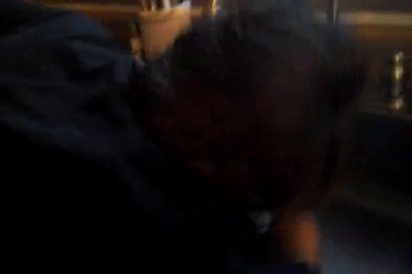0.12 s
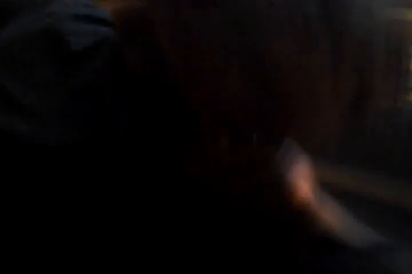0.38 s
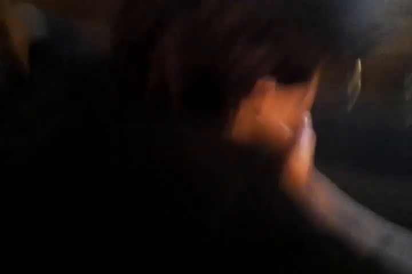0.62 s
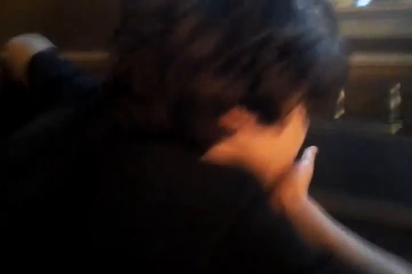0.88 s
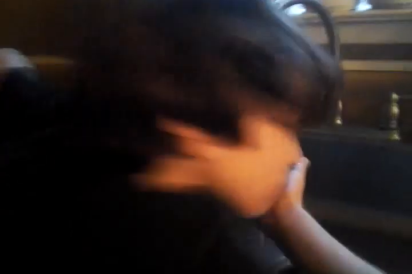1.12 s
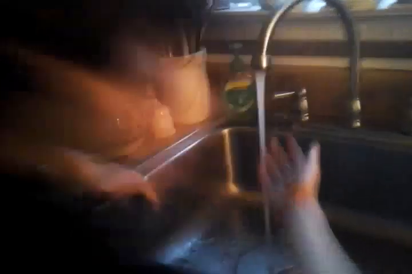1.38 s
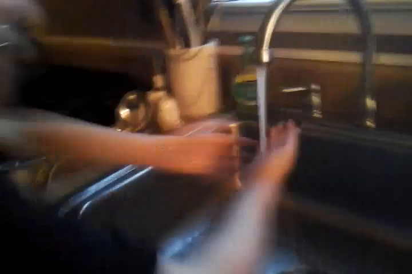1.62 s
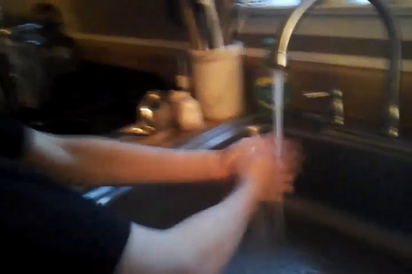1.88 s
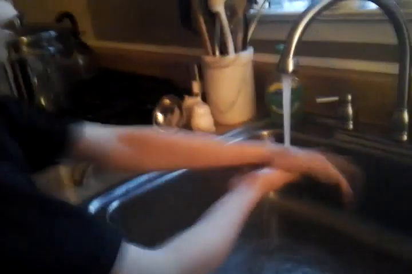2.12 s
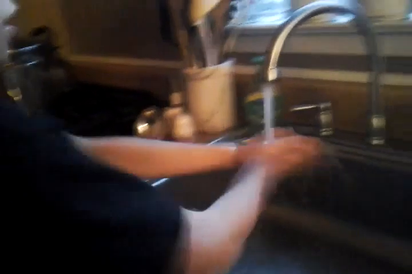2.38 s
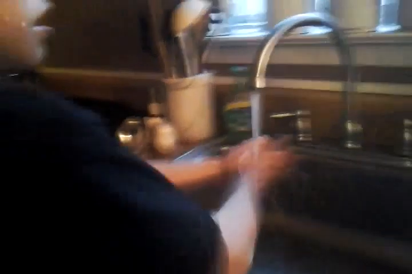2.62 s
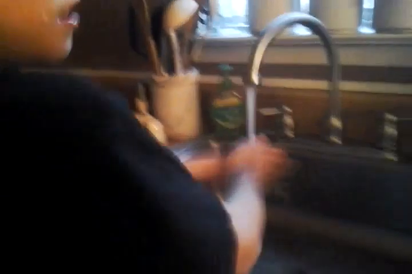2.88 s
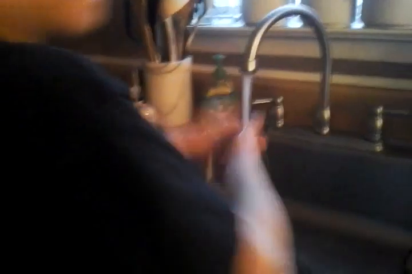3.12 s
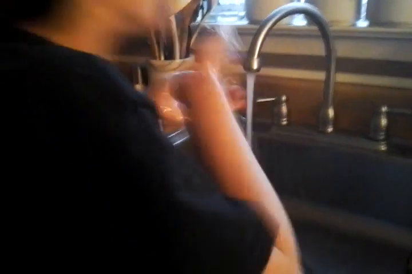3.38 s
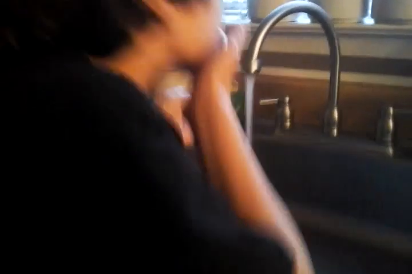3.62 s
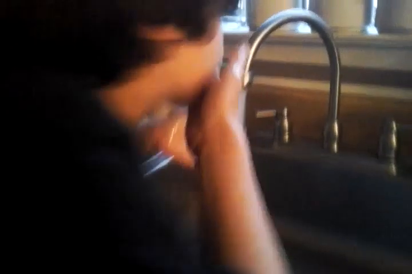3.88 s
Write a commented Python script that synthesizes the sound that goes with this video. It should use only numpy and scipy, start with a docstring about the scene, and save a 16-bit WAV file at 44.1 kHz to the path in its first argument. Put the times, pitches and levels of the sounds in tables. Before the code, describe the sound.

A running kitchen tap patters on a metal sink while hands splash in the stream.

```python
"""Someone rinses face and hands under a kitchen tap, heard close up in a small hard room. After a brief silence
the whole sound fades in: the stream patters and drums on the steel sink. Hands break it into spray, then
splashes, each a cloud of tiny ringing drops; a few fat drops land nearby. From about 1.8 s wet palms squelch
and handfuls of water slap down; the splashing surges near 3.5 s. All along, the right side of the stereo
microphone rings in the treble."""
import sys
import numpy as np
from scipy import signal
from scipy.fft import rfft, irfft
from scipy.io import wavfile

SR = 44100
rng = np.random.default_rng(int(sys.argv[2]) if len(sys.argv) > 2 else 0)


def dump_mix(stems):
    """Bounce the given channels to the path in sys.argv[1] as a 16-bit WAV at rate SR."""
    frames = np.atleast_2d(stems).T  # one column per channel
    limited = np.clip(frames, -1, 1)  # hard clip at full scale
    pcm = np.round(limited * 32767).astype(np.int16)
    wavfile.write(sys.argv[1], SR, pcm)


N = 176400
DROPS_PER_S, DROP_CYCLES = 3200, 1.43  # a small drop's ring fades to about a third in this many cycles


def undb(db):
    """Turn decibels into a gain."""
    return 10 ** (np.asarray(db) / 20)


def level(x, db):
    """Set the average (rms) level."""
    return x * undb(db) / np.sqrt(np.mean(x ** 2) + 1e-18)


def curve(rows):
    """Gain over time from (time_s, level_db) points."""
    return undb(np.interp(np.arange(N) / SR, *np.array(rows).T))


def colour(x, points, modes=()):
    """Filter by (pitch_hz, gain_db) points, with ringing notes on top."""
    f = np.fft.rfftfreq(2 * N, 1 / SR) + 1e-3
    hz, db = np.array(points).T
    peaks = 1 + sum(undb(boost) / (1 + 2j * (f - pitch) / width) for pitch, width, boost in modes)
    return irfft(rfft(x, 2 * N) * peaks * undb(np.interp(np.log(f), np.log(hz), db)))[..., :N]


def impacts(scatter_db, channels=2):
    """Dense clicks of uneven strength."""
    hit = rng.random((channels, N)) < 4 * DROPS_PER_S / SR
    strength = np.clip(rng.standard_normal((channels, N)), -2, 2)
    return hit * rng.choice([-1, 1], (channels, N)) * undb(scatter_db * strength)


def stream():
    """The stream patters on the steel and drums the basin, which booms."""
    # tone of the patter and of the boom: pitch_hz, gain_db
    patter_tone = [(100, -4), (300, 0.5), (700, 0), (1200, -1.5), (1800, -5.5), (3000, -0.5), (5500, -0.5),
                   (8000, -7), (14000, -20.5)]
    boom_tone = [(25, -19), (60, -10), (110, -16), (170, -7.5), (280, 9.5), (350, -1.5), (550, -11),
                 (900, -28.5), (2000, -31)]
    # notes the basin rings at: pitch_hz, width_hz, boost_db
    basin_notes = [(191, 26, 15), (233, 5.6, 7.5), (680, 54, 18), (1770, 35, 14)]
    # how hard the stream drums: time_s, level_db
    drum_level = [(.5, -3), (.68, 0), (.98, -3), (1.17, 1.5), (1.27, 3), (1.6, 1), (2.3, 1.5), (2.9, -0.5),
                  (3.35, 0.5), (3.62, 1.5), (4.0, 5)]
    # how loud the patter on the steel is over time: time_s, level_db
    patter_level = [(.5, -3), (.75, 2.5), (.98, -3), (1.17, 0), (1.3, 2), (1.6, -0.5), (2.3, 2), (2.9, 0.5),
                    (3.35, -1.5), (3.52, 4), (3.62, -0.5), (4.0, 2.5)]
    wander = np.interp(np.arange(N) / SR, np.arange(50) / 10, rng.standard_normal(50))
    # the boom mostly pushes one side of the microphone while it pulls the other
    drumming = impacts(scatter_db=5.5, channels=1) * np.array([[1], [-1]])
    drumming += undb(-13.5) * impacts(scatter_db=5)
    boom = level(colour(drumming, boom_tone, basin_notes) * undb(1.5 * wander), db=-41)
    patter = level(colour(impacts(scatter_db=3), patter_tone), db=-40.5)
    return patter * curve(patter_level) + boom * curve(drum_level)


def drops(times, sizes, hz, cycles, samples=96, max_lag_s=0.0002983):
    """Each drop rings for a few cycles and reaches left and right at slightly different times."""
    hz = np.clip(hz, 100, SR / 3)[:, None]
    sides = []
    for lag in max_lag_s * rng.uniform(-1, 1, (2, len(times))):
        arrival = (times + lag)[:, None] * SR
        index = np.ceil(arrival).astype(int) + np.arange(samples)
        turns = (index - arrival) * hz / SR
        fade = np.exp(-turns / cycles) * (1 - np.exp(-2 * turns))
        ring = sizes[:, None] * fade * np.sin(2 * np.pi * turns)
        sides.append(np.bincount(np.clip(index, 0, N).ravel(), ring.ravel(), N + 1)[:N])
    return np.array(sides)


def cloud(start, length, hz, octaves, shape, cycles, samples=96):
    """Many drops of scattered size and pitch, whose overall level follows shape(age)."""
    count = int(length * DROPS_PER_S)
    age = (np.arange(count) + rng.uniform(-2.008, 2.02, count)) / DROPS_PER_S
    big, high = np.clip(rng.standard_normal((2, count)), -2.5, [[1.7], [2.]])
    pitch = hz * 2 ** (octaves * high)
    strength = shape(np.maximum(age, 0))
    scatter_db = 7.5 * big * np.minimum(hz / pitch, 1)  # the highest drops are the most alike
    sizes = undb(scatter_db) * np.sqrt(pitch / hz)
    rings = drops(start + age, strength * sizes, pitch, cycles, samples)
    energy = np.sum(strength[start + age < N / SR] ** 2) * SR / DROPS_PER_S
    return rings * np.sqrt(2 * energy / (np.sum(rings ** 2) + 1e-18))


def spray():
    """Fine drops spatter off the hands without a break."""
    # how much water spatters: time_s, level_db
    spray_level = [(.4, -37), (.55, -35.5), (.7, -33), (.82, -34), (1.15, -33), (1.4, -36), (1.62, -34.5),
                   (1.82, -42), (2.1, -39), (2.4, -41), (2.85, -39), (3.02, -46.5), (3.15, -42),
                   (3.37, -40.5), (3.55, -31), (3.72, -31), (4.0, -35.5)]
    times, db = np.array(spray_level).T
    return cloud(0, N / SR, hz=6200, octaves=0.59, cycles=DROP_CYCLES,
                 shape=lambda age: undb(np.interp(age, times, db)))


def swell_and_fade(age, rise, decay):
    """A straight rise, then a fall that slows as it fades."""
    return np.clip(age / rise, 0, 1) * np.exp(-np.maximum(age - rise, 0) / decay)


def burst(start, db, rise, decay, hz, octaves, cycles, samples=96):
    """A 0.22 s cloud of drops that swells and dies away."""
    shape = lambda age: swell_and_fade(age, rise, decay)
    return undb(db) * cloud(start, .22, hz, octaves, shape, cycles, samples)


def splashes():
    """Water flies off hands and face in bursts of drops."""
    # each splash: start_s, level_db, rise_s, decay_s, pitch_hz, spread_octaves
    throws = [ (0.599, -24.5, 0.061, 0.086, 6500, 0.32), (.856, -26, .002, 0.031, 5430, .45),
              (.926, -27.5, 0.0035, 0.026, 5160, 0.43), (1.005, -36, 0.0057, 0.036, 5640, 0.47),
              (1.222, -24, 0.015, 0.027, 6960, 0.59), (1.306, -27.5, 0.0066, 0.015, 7960, 0.28),
              (1.428, -24, 0.043, 0.073, 6520, 0.53), (1.520, -24.5, 0.031, .025, 7240, 0.28),
              (1.598, -25, 0.017, 0.043, 6580, 0.33), (1.700, -29.5, 0.0085, .020, 6200, 0.32),
              (1.912, -20.5, 0.011, 0.078, 6020, 0.47), (2.092, -35, 0.0036, 0.034, 6700, 0.31),
              (2.248, -27, 0.014, 0.024, 5300, 0.34), (2.336, -29, 0.0065, 0.022, 6740, 0.098),
              (2.671, -27, 0.0093, 0.024, 5000, 0.36), (2.770, -36, .015, 0.021, 6140, 0.54),
              (2.855, -32.5, 0.016, 0.039, 5660, 0.31), (3.063, -38.5, .005, .040, 5450, 0.24),
              (3.193, -32, 0.019, 0.072, 4800, 0.52), (3.306, -31.5, 0.017, 0.031, 5400, 0.12),
              (3.412, -18.5, 0.052, 0.031, 5560, 0.57), (3.516, -27, 0.016, 0.028, 4200, 0.6),
              (3.593, -21.5, 0.0072, 0.034, 5180, 0.47), (3.645, -22.5, .004, 0.015, 4400, 0.31),
              (3.772, -24, 0.01, 0.039, 7340, 0.31), (3.828, -28, 0.029, 0.024, 6260, 0.46),
              (3.879, -27.5, 0.013, 0.023, 6400, 0.65), (3.935, -25, 0.025, 0.037, 6350, 0.44)]
    return sum(burst(*row, DROP_CYCLES) for row in throws)


def fat_drops():
    """Single big drops land close to the microphone."""
    # each drop: start_s, level_db, pitch_hz
    landings = [(.859, -14, 5200), (1.5163, -7, 6300), (1.5372, -5, 6460), (1.549, -8, 6130),
                (1.600, -13, 5970), (1.917, -16, 6240), (2.34, -20, 6400), (2.4851, -17, 4930),
                (2.683, -15, 5600), (2.879, -16, 5700), (3.389, -16, 4400), (3.453, -8, 5600),
                (3.6, -18, 4960)]
    times, db, hz = np.array(landings).T
    return drops(times, undb(db), hz, cycles=2)


def squelches():
    """Wet palms squeeze water out through a small ringing hollow."""
    # each squeeze: start_s, level_db, rise_s, decay_s, pitch_hz, spread_octaves
    squeezes = [ (1.816, -38, 0.011, 0.032, 3040, 0.14), (2.242, -30.5, 0.011, 0.037, 2530, 0.15),
                (2.484, -21.5, 0.0022, 0.018, 4710, 0.17), (2.784, -26.5, .003, 0.014, 4430, 0.15),
                (2.948, -26.5, 0.0027, 0.02, 4090, 0.1), (3.305, -32, .004, 0.037, 3340, 0.2),
                (3.387, -24.5, .002, 0.021, 4370, .12), (3.432, -23, .002, 0.011, 4000, 0.053),
                (3.594, -19.5, 0.006, 0.019, 4680, 0.15), (3.944, -28.5, 0.0045, 0.033, 4200, 0.074)]
    return sum(burst(*row, cycles=3.5, samples=160) for row in squeezes)


def slaps():
    """A handful of water lands as a dense rush of dull impacts."""
    # each handful: start_s, level_db, rise_s, decay_s
    handfuls = [(1.916, -39.5, 0.024, .06), (2.002, -32.5, 0.01, 0.017), (3.434, -28, 0.023, 0.039)]
    # tone of water on skin: pitch_hz, gain_db
    skin_tone = [(70, -26), (170, -4), (400, -5.5), (800, 1), (1500, -0.5), (2200, -2.5), (3500, -7),
                 (8000, -32)]
    t = np.arange(N) / SR
    force = sum(undb(db) * swell_and_fade(t - start, rise, decay) for start, db, rise, decay in handfuls)
    return force * level(colour(impacts(scatter_db=4), skin_tone), db=0)


def kitchen(x):
    """Sink walls and room echo briefly; the pattern changes as the water lands here and there."""
    t = np.arange(SR // 4) / SR
    power = 0
    for fade_s, db in ((0.028, -1.5), (0.21, -3.5)):  # sink, then room; fade_s is the time to fall 60 dB
        tail = (np.exp(-np.log(1000) * t / fade_s) * (1 - np.exp(-20 * t / fade_s))) ** 2
        power = power + undb(db) ** 2 * tail / tail.sum()
    hop = int(.06 * SR)  # a new echo pattern every 60 ms
    window = np.sin(np.pi * np.arange(2 * hop) / (2 * hop))
    echoes = np.zeros((2, N + len(t)))
    for i in range(0, N, hop):
        piece = x[:, i:i + 2 * hop] * window[:N - i]
        echo = signal.fftconvolve(piece, rng.standard_normal((2, len(t))) * np.sqrt(power), axes=1)
        echoes[:, i:i + echo.shape[1]] += echo
    return (x + echoes[:, :N]) / np.sqrt(1 + power.sum())


def scene():
    """The stream, plus rinsing that echoes in the kitchen; the near drops echo only a little."""
    # the whole sound fades in: time_s, level_db
    fade_in = [(.33, -110), (.37, -45), (.39, -24.5), (.43, -10), (.55, -4.5), (.62, -3)]
    near = fat_drops()
    tap = stream()
    low_cut = signal.butter(2, 1930, "high", fs=SR, output="sos")  # small drops make little low sound
    hands = signal.sosfilt(low_cut, spray() + splashes() + squelches())
    return (tap + near + kitchen(hands + slaps() + undb(-9) * near)) * curve(fade_in)


def record(dry):
    """The microphone colours each side, thins the deep bass, rounds big peaks and cuts the very top."""
    # tone of each microphone opening: pitch_hz, gain_db
    left_tone = [(300, 2), (1500, 4.5), (2500, 1.5), (4000, 1), (5800, 6), (7500, 4), (10000, 5),
                 (14000, 6.5)]
    right_tone = [(300, 1.5), (1500, 4.5), (2500, 6), (4000, 5), (5000, 9.5), (5750, 17), (6600, 12.5),
                  (8000, 7.5), (10000, 9), (14000, 8)]
    low_cut_hz, top_hz, ceiling = 97, 14500, 1.1
    sides = np.array([colour(dry[0], left_tone), colour(dry[1], right_tone)])
    sides = signal.sosfilt(signal.butter(2, low_cut_hz, "high", fs=SR, output="sos"), sides)
    sides = sides / (1 + (sides / ceiling) ** 4) ** .25
    return signal.sosfilt(signal.ellip(10, .2, 80, top_hz, fs=SR, output="sos"), sides)


dry = scene()
out = record(dry)
dump_mix(out)
```